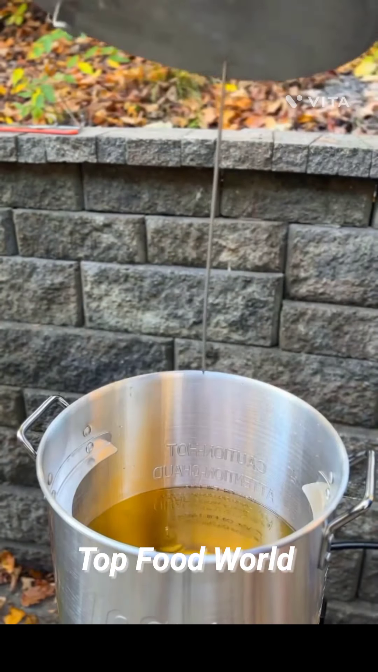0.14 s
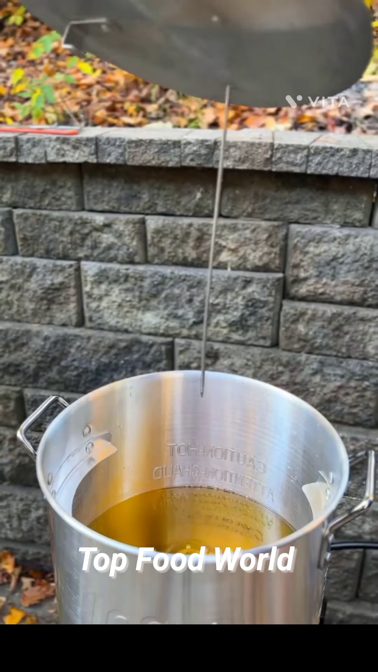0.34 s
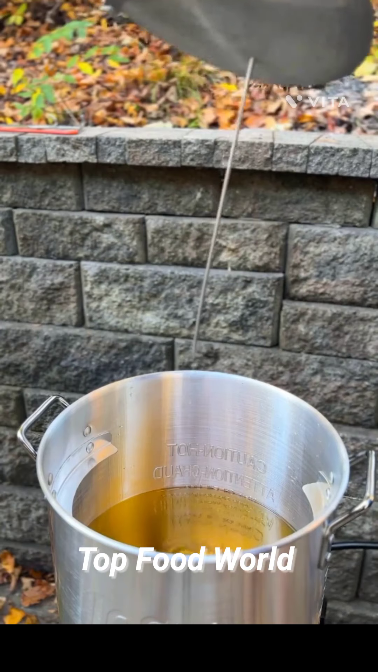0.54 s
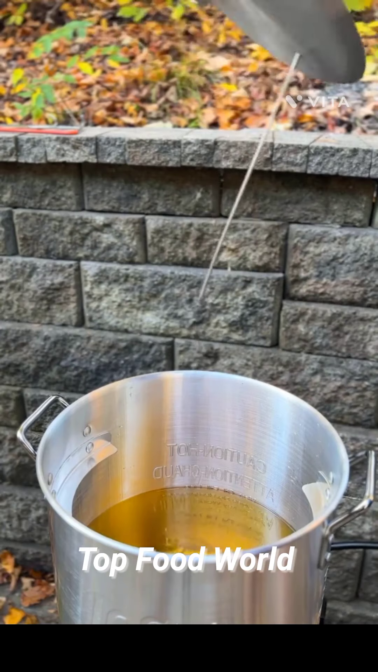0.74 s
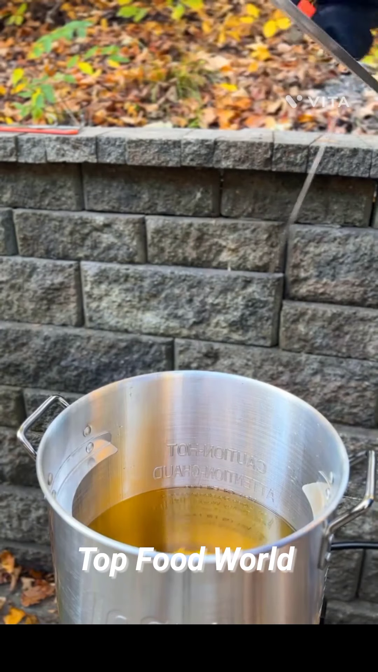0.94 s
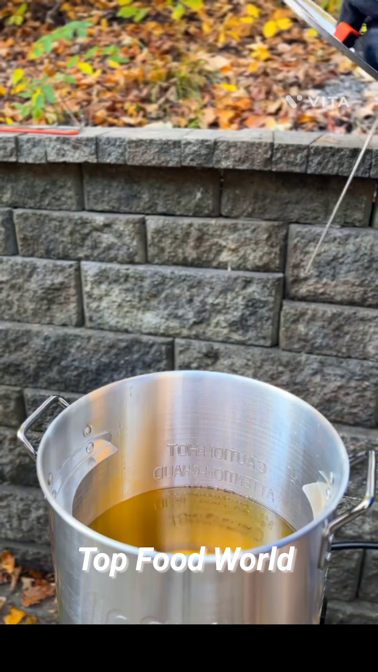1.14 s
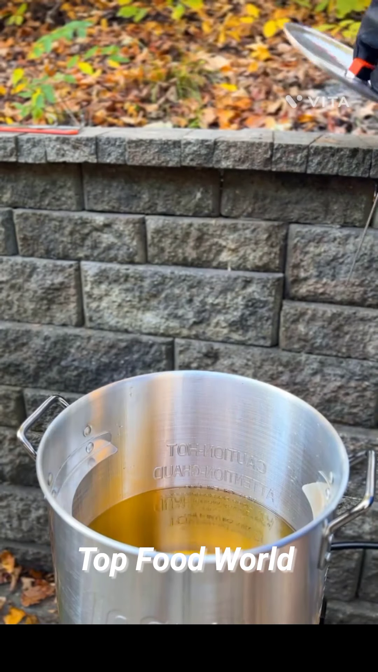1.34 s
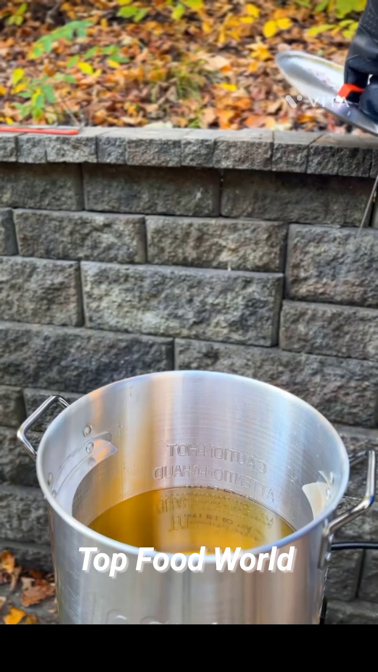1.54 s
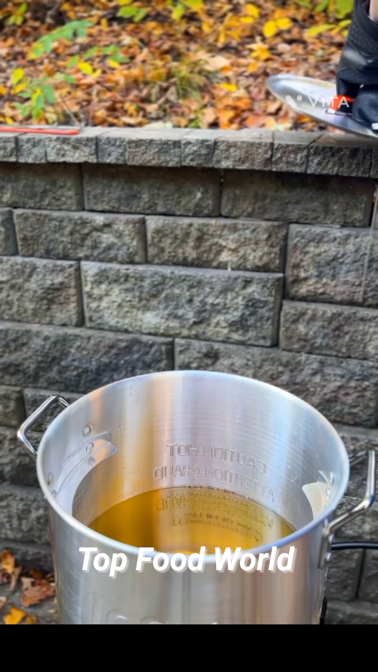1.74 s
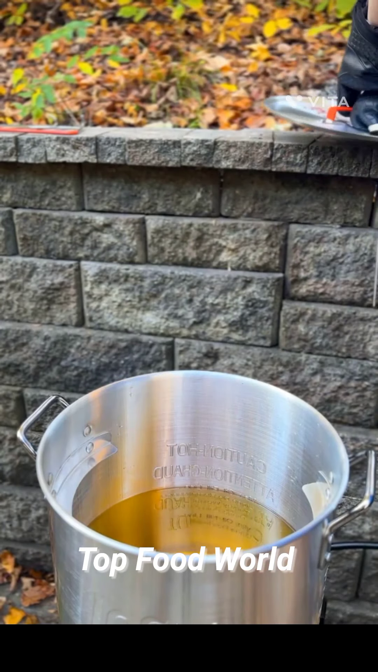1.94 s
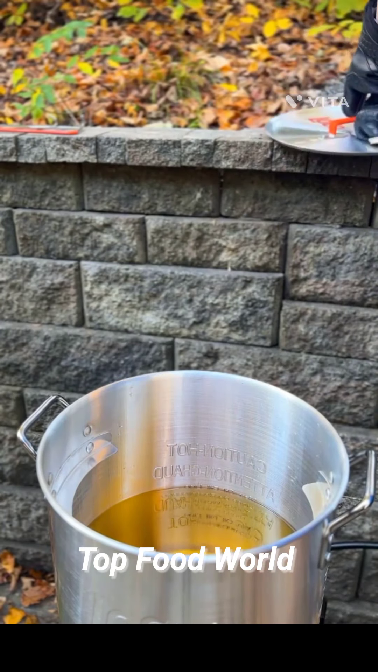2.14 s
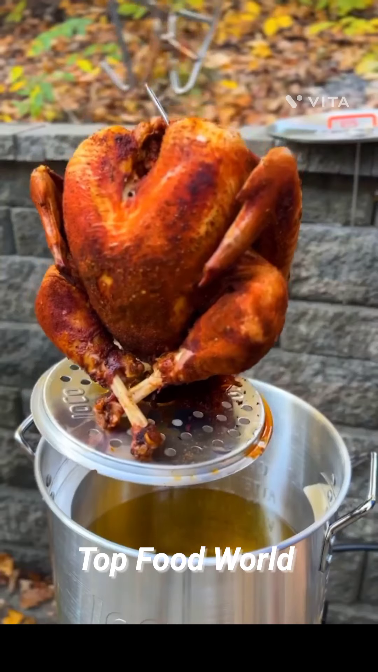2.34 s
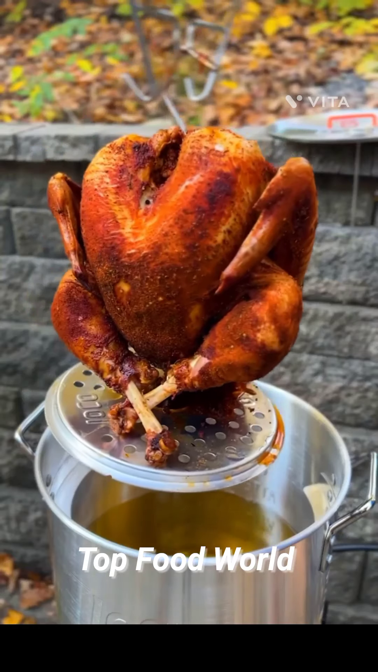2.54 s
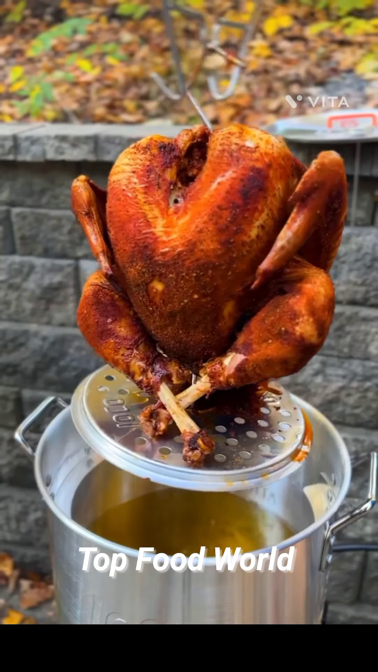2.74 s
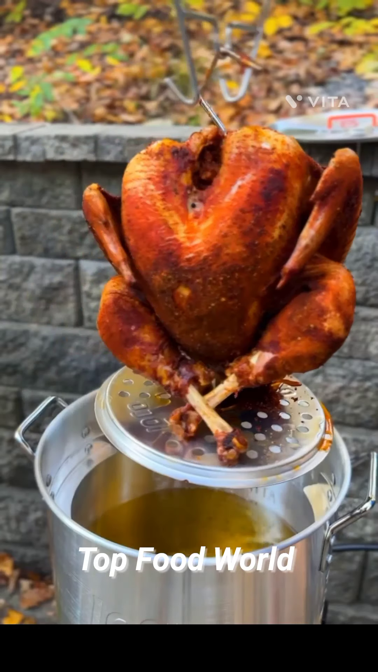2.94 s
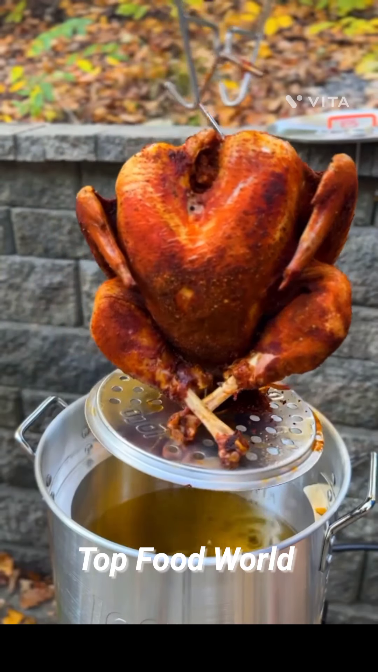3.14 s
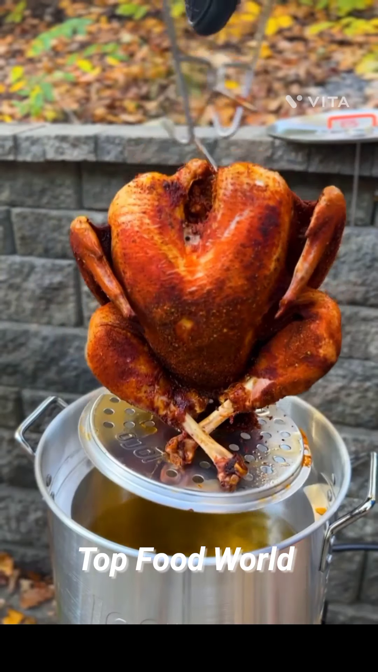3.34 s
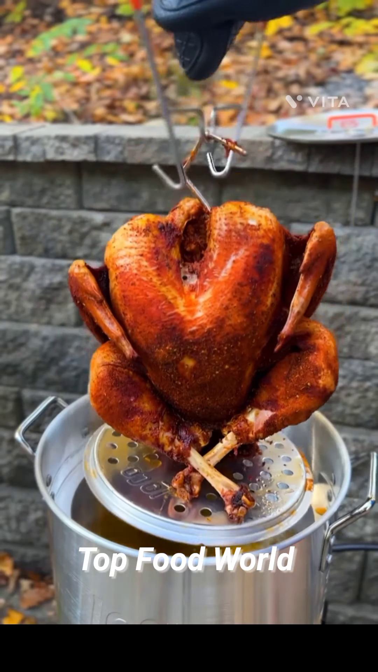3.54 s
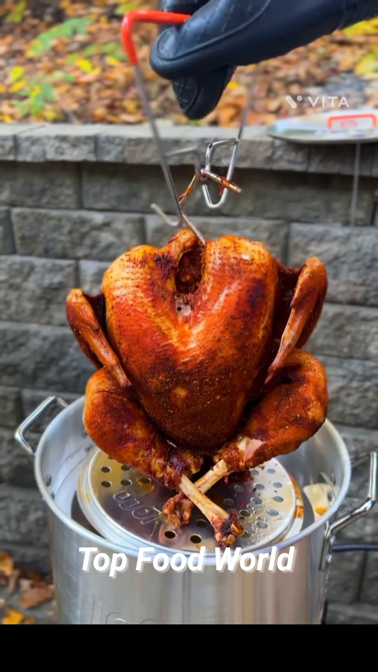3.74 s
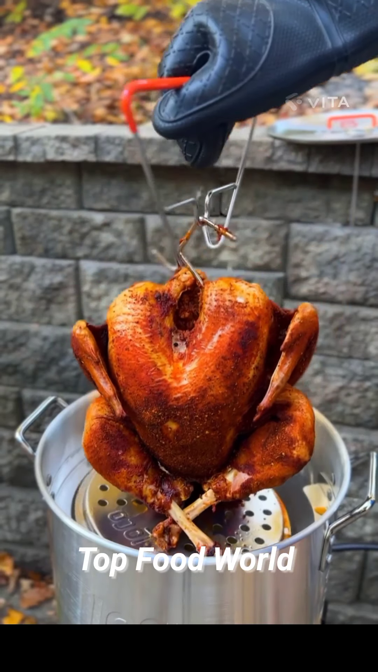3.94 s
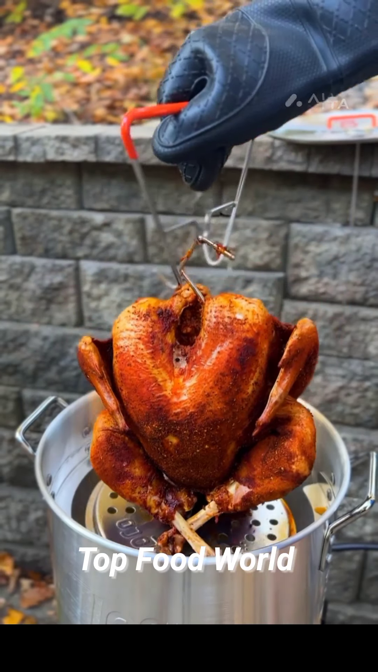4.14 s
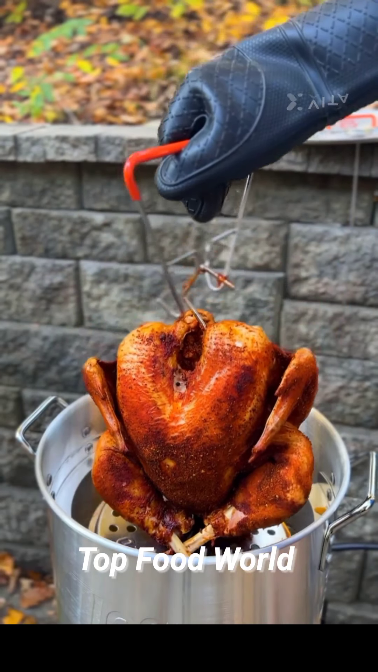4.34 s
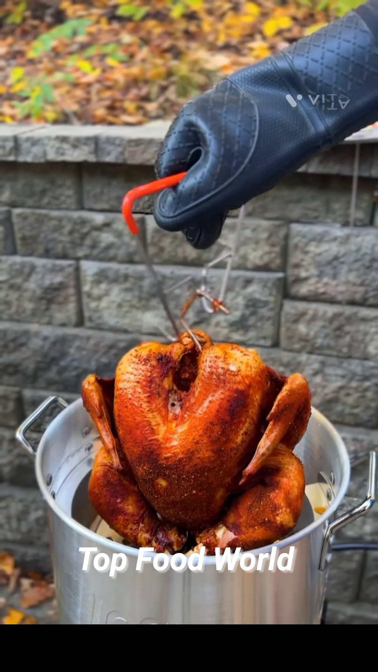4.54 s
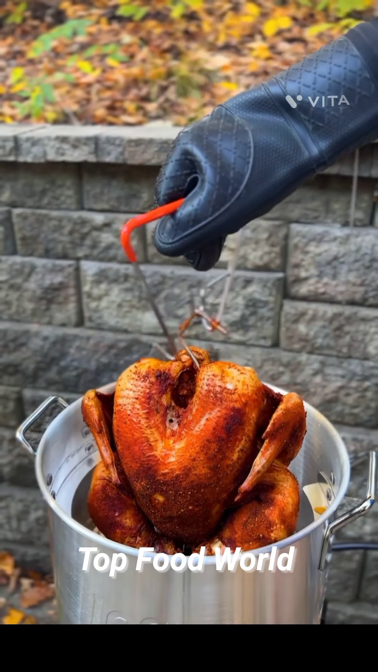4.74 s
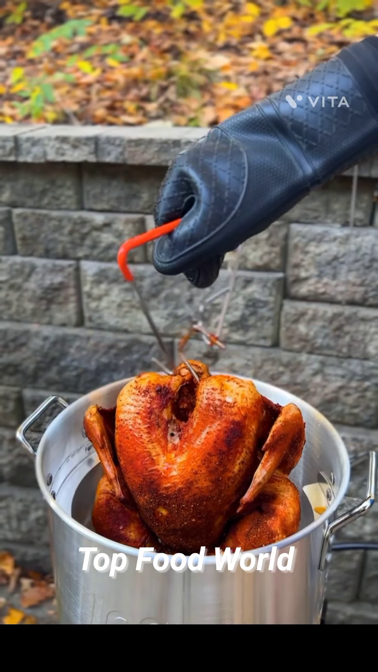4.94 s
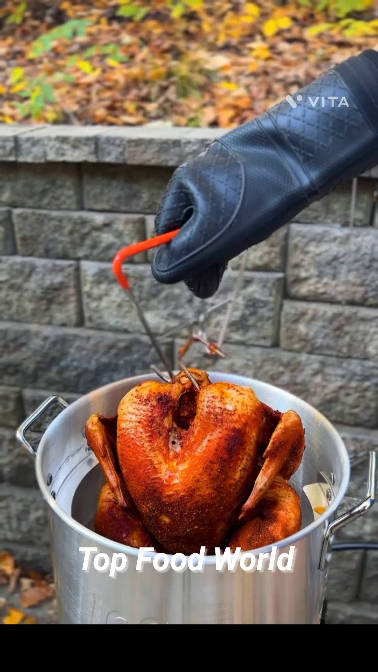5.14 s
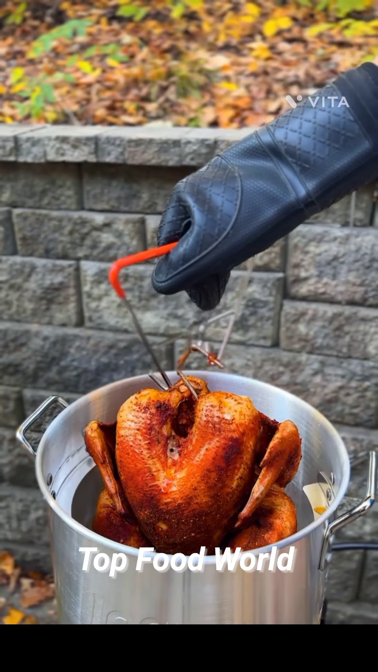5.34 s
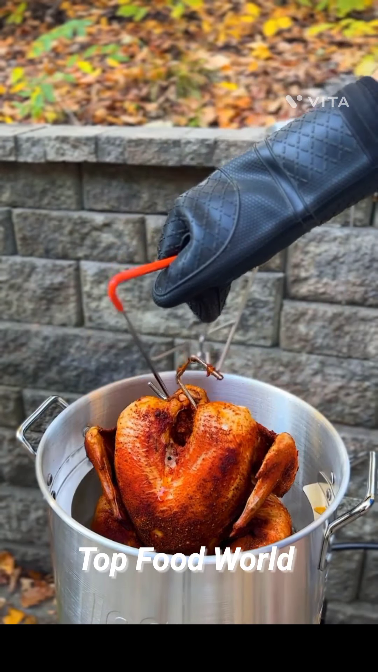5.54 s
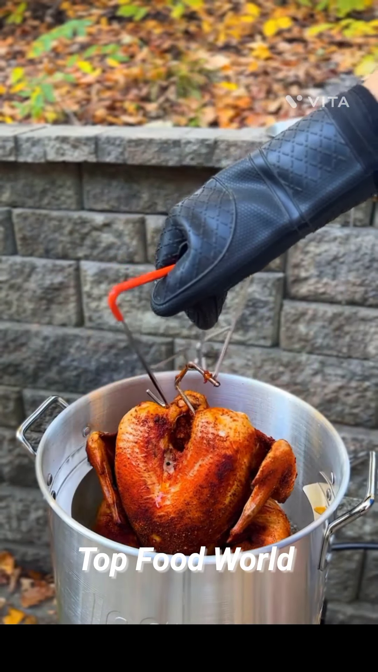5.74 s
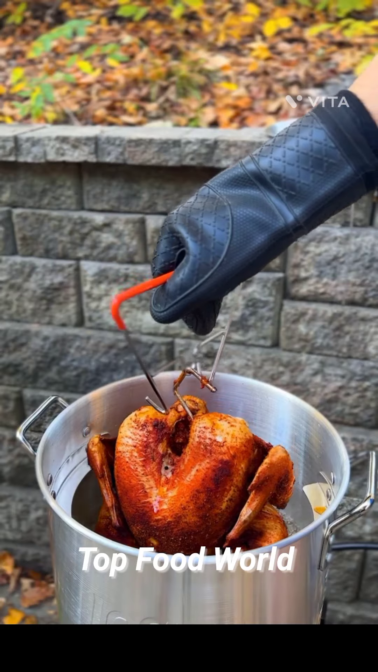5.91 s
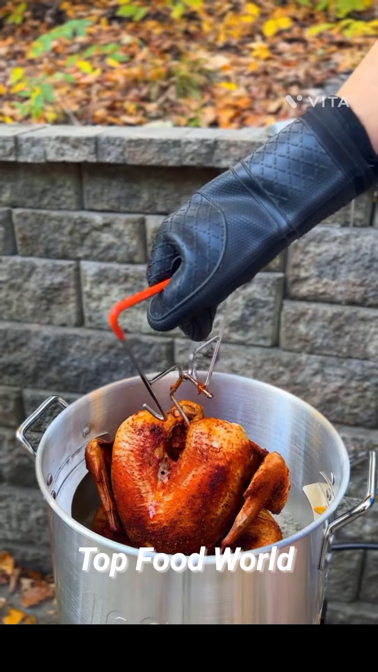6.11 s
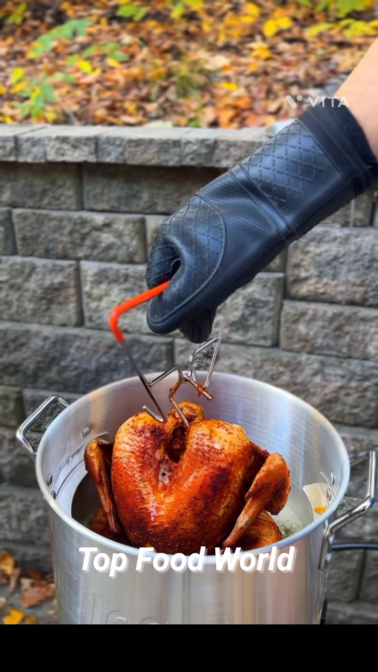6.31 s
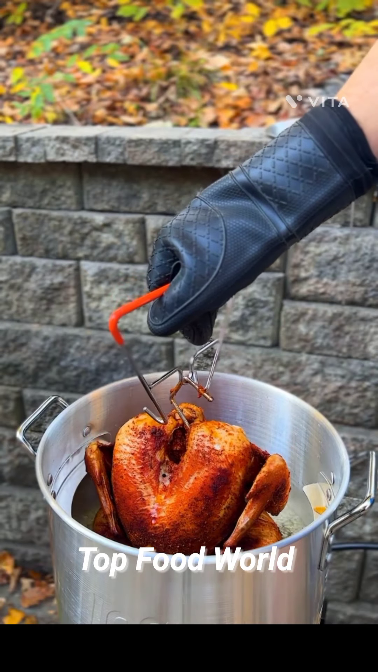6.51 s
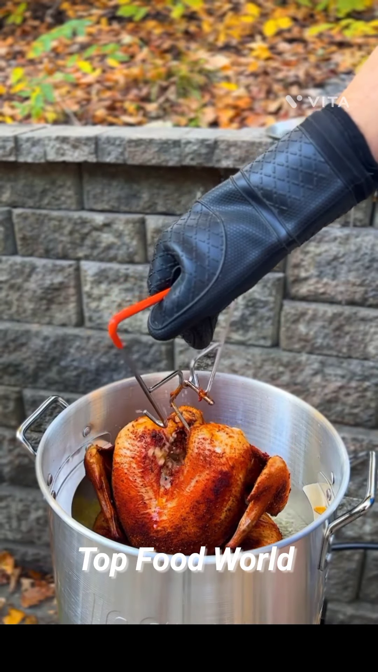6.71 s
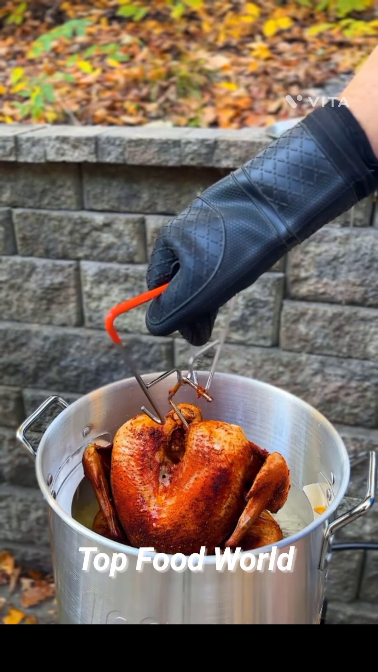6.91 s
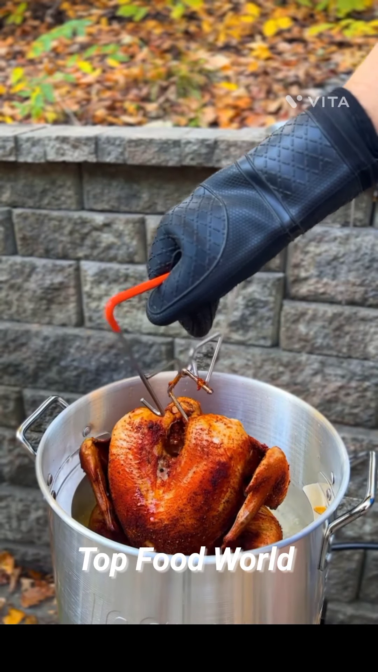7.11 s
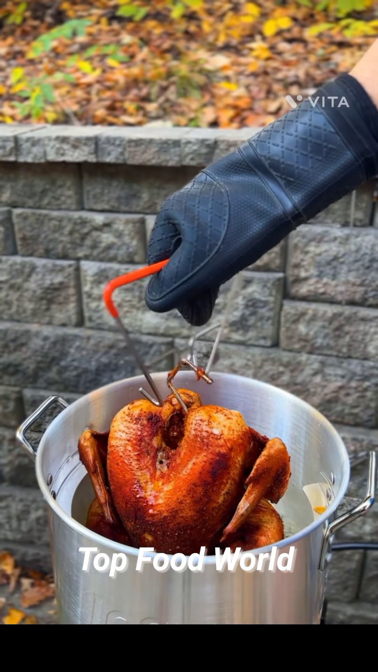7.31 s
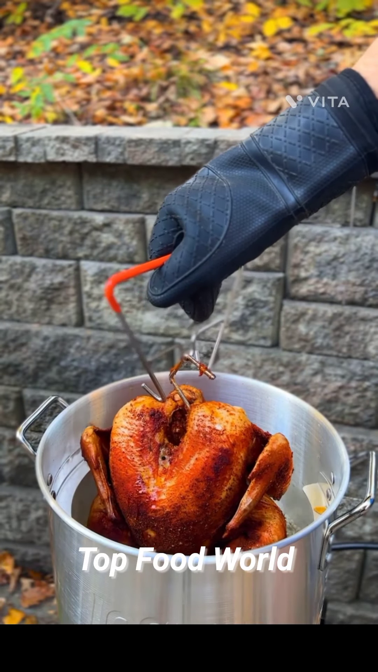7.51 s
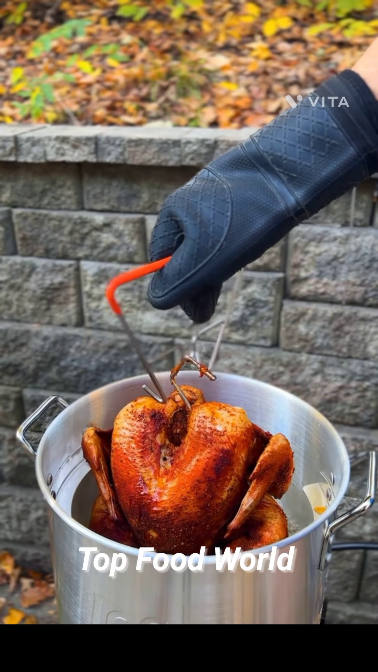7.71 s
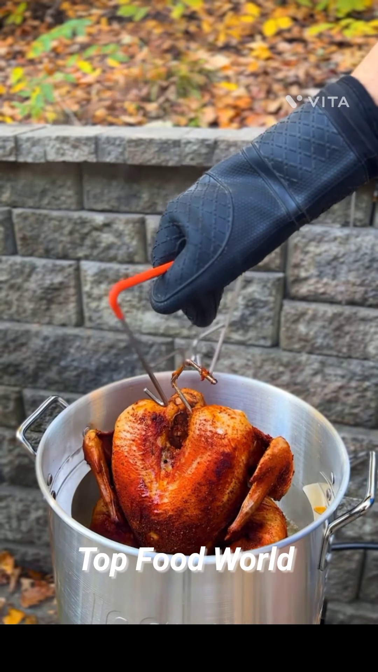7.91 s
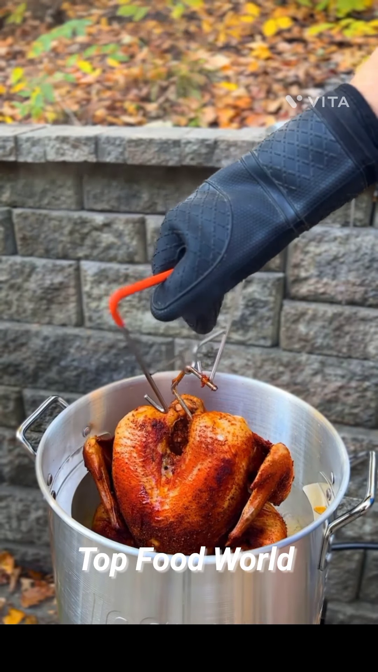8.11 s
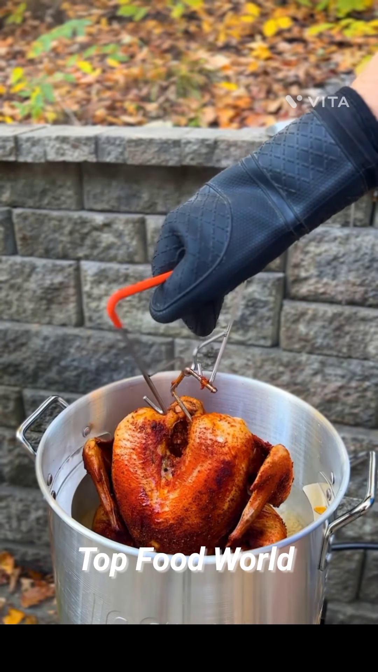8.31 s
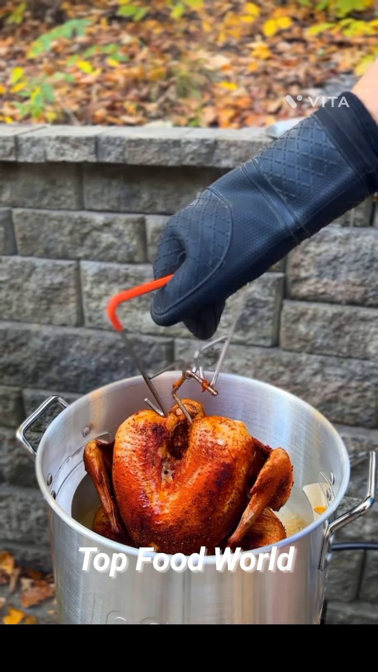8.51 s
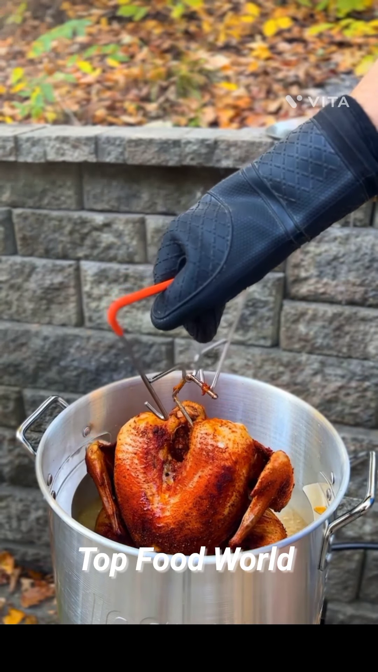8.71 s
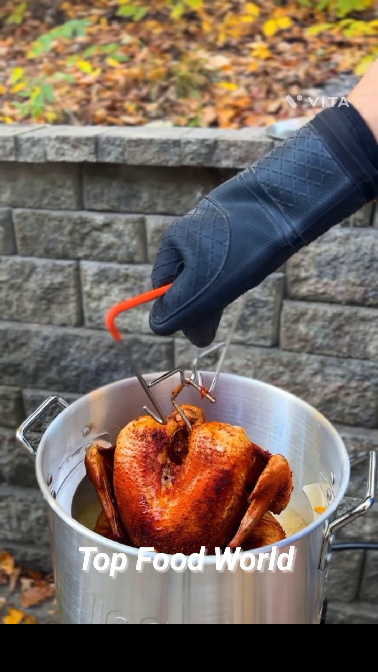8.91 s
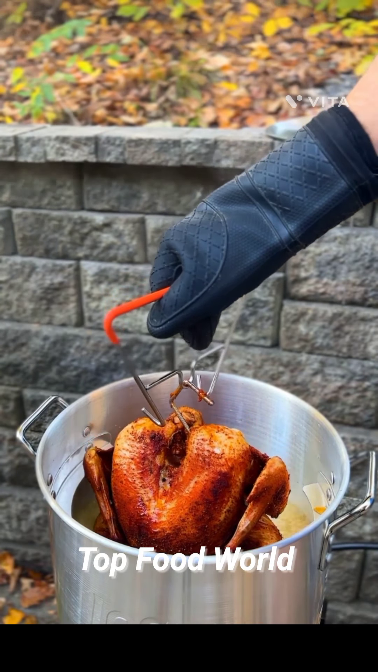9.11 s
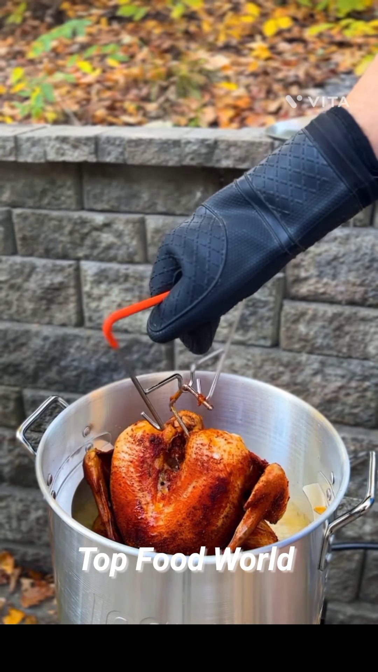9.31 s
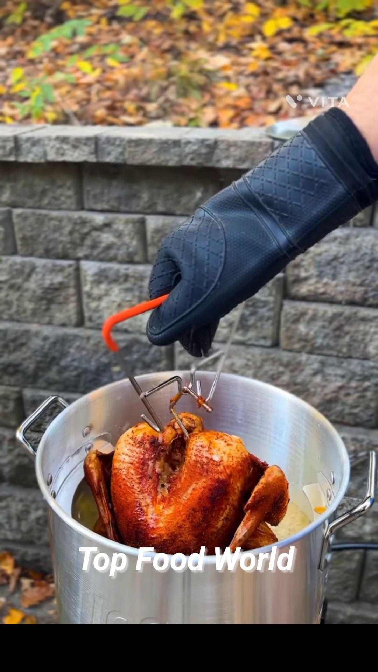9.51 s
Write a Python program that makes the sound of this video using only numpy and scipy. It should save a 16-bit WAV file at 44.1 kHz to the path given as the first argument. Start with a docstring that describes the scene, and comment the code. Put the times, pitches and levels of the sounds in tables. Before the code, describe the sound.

Hot oil pops and builds to a loud, bubbling sizzle as a turkey is lowered into a pot, after a few metal clanks.

```python
"""Hot oil boils in a tall aluminium pot as a turkey is lowered in, outdoors over a hissing gas burner.
First feet scuff in dry leaves, the lid is set on a stone wall, and a hook and rack clank.
Juice drips into the oil and flashes to steam in single pops that excite the pot's air column and wall.
As the bird sinks, wet skin squeaks, oil spits and the bubbles thicken to a roaring boil;
the bird plugs the pot, so the gaps around it resonate instead."""
import sys
import numpy as np
from scipy import signal
from scipy.fft import rfft, irfft, next_fast_len
from scipy.io import wavfile
from scipy.ndimage import uniform_filter1d, map_coordinates

SR = 44100
rng = np.random.default_rng(int(sys.argv[2]) if len(sys.argv) > 2 else 0)


def inscribe(sig):
    """Save sig as 16-bit PCM at rate SR to the path in sys.argv[1].

    A 1-D sig is mono; a 2-D sig holds one channel per row.
    Samples are clipped to [-1, 1] before scaling.
    """
    pcm = np.round(np.clip(np.atleast_2d(sig).T, -1, 1) * 32767)
    wavfile.write(sys.argv[1], SR, pcm.astype(np.int16))


N = 426006

# reverberation of the yard: frequency_hz, t60_s
YARD_DECAY = [(200, 0.3), (2000, 0.12), (12000, 0.21)]
# spectra of the low rumble and the gas jet: frequency_hz, density_db
RUMBLE_SPECTRUM = [(15, -14), (25, -1), (35, -18), (55, -7.5), (80, -6.5), (120, -12), (190, -17),
                   (400, -48), (2000, -89)]
JET_SPECTRUM = [(100, -5.5), (300, 5.5), (480, -2), (950, 0.5), (1600, -6.5), (2400, -7.5), (3450, -5),
                (4800, -13), (6000, -13.5), (6500, -12.5), (7500, -18.5), (10000, -22.5), (16000, -27)]
# level of the low rumble, from the burner and later the boiling oil: time_s, level_db
LOW_RUMBLE_LEVEL = [(0.0, -57), (1.1, -56), (3.2, -56), (4.2, -61), (5.6, -58.5), (7.61, -51.5),
                    (8.85, -61.5), (9.66, -59)]
# shoes in dry leaves, then wire scraping on metal: peak_s, level_db, centre_hz, width_octaves, sigma_s
RUBS = [(0.861, -46, 2560, 1.2, .006), (0.908, -43, 3540, 0.34, 0.0086), (0.919, -50, 3000, 1.4, 0.028),
        (0.95, -42, 1270, 1.4, 0.0058), (0.981, -50, 1200, .9, 0.016), (1.046, -49.5, 7000, 1.2, .011),
        (1.085, -58, 8400, .35, 0.02), (1.097, -58, 2600, 2, .19), (1.17, -56.5, 243, .58, .19),
        (2.222, -47, 1990, 0.049, 0.0083), (2.25, -47, 1990, 0.05, 0.007), (2.275, -48, 1960, .06, 0.0066),
        (2.284, -55, 6000, 0.065, 0.044), (2.291, -52, 7550, 0.1, .018)]
# impacts of lid on stone and of hook and rack: start_s, level_db, tilt_db_per_octave
LID_IMPACTS = [(1.749, -39, -4.5), (1.764, -38, -3), (1.775, -33, -3), (1.808, -29, -7), (1.828, -33, -3.5),
               (1.843, -37, -6), (1.869, -35, -1), (1.8745, -26.5, 2.3), (1.981, -41.5, -2)]
RACK_IMPACTS = [(2.271, -52, 4), (2.302, -46, 4.5), (2.318, -28.5, -3.5), (2.323, -28, -4), (2.328, -43, 7),
                (2.345, -28.5, -3)]
# normal modes of the lid and the rack: frequency_hz, level_db, t60_s
LID_MODES = [(509, -5, 0.13), (560, -9, 0.092), (758, -1, 0.082), (2030, -14, .09), (3170, -17, 0.18),
             (4170, -17, .08), (5370, -16, 0.16), (6270, -10, .06), (7070, -14, .06), (7700, 1.5, .014),
             (8040, -2, .014), (12100, -24, .057)]
RACK_MODES = [(182, -20.5, 0.17), (537, -5, 0.14), (597, -4.5, 0.23), (810, 4, 0.05), (1014, 1.5, 0.16),
              (1250, -2.5, 0.19), (1870, -7, 0.27), (2070, -12, 0.15), (2480, -17, 0.16), (3055, -13, 0.36),
              (3640, -19, 0.34), (5400, -21, .12), (5770, -10.5, 0.11), (7300, -4.5, 0.047),
              (8800, -15, 0.054), (10750, -27, .08)]
# the loudest single pops: start_s, level_db, pitch_hz, t60_s
DROP_POPS = [(2.6, -43.5, 2930, 0.041), (2.679, -45, 335, 0.055), (2.756, -46, 1530, 0.074),
             (2.788, -42.5, 3620, .076), (2.9625, -23, 3340, 0.033), (3.021, -34, 1510, 0.01),
             (3.151, -34.5, 1050, 0.031), (3.203, -27.5, 1750, 0.029), (3.248, -34, 1440, .058),
             (3.278, -36, 1510, 0.048), (3.311, -32.5, 896, .04), (3.423, -29, 876, 0.11),
             (3.433, -27.5, 797, 0.11), (3.4754, -23, 2880, 0.03), (3.494, -37, 800, 0.11),
             (3.529, -25, 1210, 0.06), (3.549, -34, 1230, .08), (3.584, -30, 1930, .03),
             (3.655, -22.5, 966, 0.062), (3.676, -24.5, 950, 0.079), (3.777, -26, 1862, 0.028),
             (3.795, -28, 1710, 0.045), (3.899, -29.5, 839, 0.021), (3.93, -24, 3170, 0.037),
             (3.981, -29, 1970, 0.027), (3.988, -34, 768, 0.079), (3.993, -25, 2180, 0.034),
             (4.045, -26, 2200, 0.037), (4.196, -25.5, 780, .05), (4.225, -24, 1140, 0.074),
             (4.262, -16.5, 810, 0.052), (4.408, -15.5, 650, 0.032), (4.48, -25, 910, .02),
             (4.555, -25.5, 618, 0.12), (4.584, -21, 2200, 0.031), (4.643, -17.5, 1190, .05),
             (4.684, -22, 1690, 0.065), (4.73, -15.5, 1850, 0.093), (4.762, -22, 624, .04),
             (4.861, -16.5, 1760, 0.092), (4.962, -24.5, 1630, 0.095), (4.987, -22.5, 760, 0.053),
             (5.037, -18, 1060, 0.029), (5.143, -18.5, 1880, 0.06), (5.213, -14, 1063, 0.052),
             (5.248, -17, 1070, 0.039), (5.33, -16.5, 2046, 0.068), (5.359, -16.5, 1604, .09),
             (5.448, -18, 2730, 0.06), (5.493, -16.5, 2910, 0.05)]
# resonances of the air column, thin wall and gaps around the bird: frequency_hz, bandwidth_hz, gain_db
AIR_MODES = [(311, 57, 15), (793, 60, 15), (1040, 140, 5), (1570, 37, 3.5), (2130, 40, -6), (3430, 87, 4)]
WALL_MODES = [(1505, 12, 0), (2130, 14, 2), (2650, 14, 3), (3290, 14, 5), (3900, 16, 14), (4800, 18, 9),
              (5190, 18, 7), (6500, 25, 6)]
GAP_MODES = [(384, 72, -1), (613, 75, -11), (845, 38, -28), (950, 79, -11), (1133, 64, -15),
             (1615, 81, -10.5), (1895, 49, -5), (3500, 94, -7), (5130, 300, -12)]
# spectra of a pop's fizz, bursts in the open pot and the full boil: frequency_hz, density_db
FIZZ_SPECTRUM = [(700, -1), (1500, -1), (3800, -1), (5500, -4), (7500, -9), (10000, -20), (16000, -29)]
BURST_SPECTRUM = [(130, -10.5), (300, -6.5), (540, -9.5), (1000, 1.5), (2400, -1.5), (4000, -11),
                  (7000, -16), (10000, -25.5), (16000, -33)]
BOIL_SPECTRUM = [(60, -19.5), (150, -6), (230, -4.5), (310, 0), (385, -2), (480, -6.5), (630, -6),
                 (900, -3), (1400, -5.5), (2300, -7.5), (3300, -5), (3900, -9), (5200, -15.5), (9800, -33),
                 (16000, -38)]
# steam escaping wet skin: start_s, level_db, pitch_hz, length_s
SKIN_SQUEAKS = [(2.928, -36, 2520, 0.032), (3.21, -35, 5000, 0.031), (3.397, -34.5, 4970, 0.013),
                (3.427, -39, 2830, 0.021), (3.555, -35, 5900, 0.0144), (3.632, -40, 3000, 0.03),
                (3.713, -30, 5280, 0.024), (4.058, -33, 4770, 0.026), (4.088, -32, 6830, 0.012),
                (4.327, -27.5, 3800, 0.016), (4.45, -23.5, 3360, 0.015), (4.497, -35, 4540, .018),
                (4.935, -24, 4680, 0.0091), (5.075, -30, 4000, 0.021), (5.116, -18, 6800, 0.01)]
# strength of the steam leaving the oil: time_s, level_db
STEAM_LEVEL = [(2.5, -61), (3.0, -59), (3.56, -44), (3.63, -40), (4.08, -42), (4.27, -41), (4.41, -34),
               (5.37, -27), (5.77, -28), (5.99, -26), (6.49, -24), (6.83, -21), (7.76, -21), (7.96, -23),
               (9.18, -26), (9.66, -26.5)]
# runs of big bubbles as oil floods the bird's hollows: peak_s, boost_db, sigma_s
FLOOD_GLUGS = [(5.776, 7.5, 0.22), (7.62, 3.5, 0.18), (8.192, 3, 0.28)]
# sharp spits of oil: start_s, level_db
OIL_SPITS = [(3.5986, -18.5), (3.6146, -11.5), (4.388, -20), (5.12, -23), (5.378, -14), (5.625, -15),
             (5.9445, -9.5), (6.8137, -7), (7.0397, -3.5), (7.098, -8), (7.324, -7), (8.356, -5.5),
             (8.53, -12)]
# big bubbles tearing beside the bird: start_s, level_db, brightness_hz
BUBBLE_GULPS = [(5.537, -10, 900), (5.686, -15, 450), (5.766, -13, 600), (7.788, -10, 900),
                (7.894, -10, 900), (8.138, -13, 1200), (8.203, -9, 650), (8.366, -10.5, 650),
                (8.4845, -7.5, 2200), (8.697, -13.5, 1400), (8.783, -11.5, 900), (8.819, -10, 900),
                (8.881, -12, 950), (8.92, -14, 800), (9.048, -11.5, 900), (9.135, -16, 1000),
                (9.262, -13, 1600), (9.329, -12.5, 950), (9.522, -13.5, 1500), (9.565, -11.5, 850)]

# the steady patter of bubbles begins, the bird touches the oil, its legs are in, it plugs the pot
PATTER_S, TOUCH_S, WET_S, SUNK_S = 3, 4.57, 5.55, 6.5
EASE_S, CALM_S = 7.7, 8.9  # the boil eases between these times


def amp(db):
    """Amplitude ratio of a level in decibels."""
    return 10 ** (np.asarray(db) / 20)


def unit(x):
    """Normalisation to rms 1."""
    return x / np.sqrt(np.mean(x ** 2) + 1e-20)


def steady(x):
    """Division by the running rms removes slow changes of level."""
    power = uniform_filter1d(uniform_filter1d(x * x, SR // 6), SR // 6)
    return x / np.sqrt(np.abs(power) + 1e-12)


def along(points, hz):
    """Interpolation on a logarithmic frequency axis."""
    frequencies, values = np.transpose(points)
    return np.interp(np.log(hz + 1), np.log(frequencies + 1), values)


def contour(points):
    """Linear interpolation in time, one value a sample."""
    return np.interp(np.arange(N) / SR, *np.transpose(points))


def ramp(start_s, end_s):
    """Linear transition from 0 to 1."""
    return np.clip((np.arange(N) / SR - start_s) / max(end_s - start_s, 1e-3), 0, 1)


def swell(peak_s, rise_s, fall_s):
    """Two-sided Gaussian envelope of height 1."""
    t = np.arange(N) / SR - peak_s
    return np.exp(-(t / np.where(t < 0, rise_s, fall_s)) ** 2 / 2)


def wobble(knots_per_s):
    """Smooth random modulation: a spline through Gaussian values."""
    knots = rng.standard_normal(int(N * knots_per_s / SR) + 4)
    return map_coordinates(knots, [np.arange(N) * knots_per_s / SR])


def add(track, start_s, sound):
    """Superposition of a sound on a track."""
    part = track[round(start_s * SR):][:len(sound)]
    part += sound[:len(part)]


def coloured(x, spectrum, size=4096):
    """Minimum-phase filtering shapes the spectrum and keeps attacks sharp."""
    gain = amp(along(spectrum, np.fft.rfftfreq(size, 1 / SR)))
    cepstrum = irfft(np.log(gain + 1e-6))
    cepstrum[1:size // 2] *= 2
    cepstrum[size // 2 + 1:] = 0
    return signal.fftconvolve(x, irfft(np.exp(rfft(cepstrum))))[:N]


def band(x, lo_hz, hi_hz, order=2):
    """Causal Butterworth band-pass."""
    edges_hz = [lo_hz, min(hi_hz, SR / 2 - 1000)]
    return signal.sosfilt(signal.butter(order, edges_hz, "band", fs=SR, output="sos"), x)


def echoes(x, wet_db, size=8192):
    """Diffuse reverberation: each block of sound gains its own short tail of decaying noise."""
    blocks = np.pad(x, (0, -N % size)).reshape(-1, size)
    hz, t, noise = signal.stft(rng.standard_normal(blocks.shape), SR, nperseg=256)
    decay = amp(-60 * t / along(YARD_DECAY, hz)[:, None])
    tails = signal.istft(noise * decay, SR, nperseg=256)[1]
    tails /= np.linalg.norm(tails, axis=1, keepdims=True)
    out = x.copy()
    for k, tail in enumerate(signal.fftconvolve(blocks, tails, axes=1)):
        add(out, k * size / SR + .002, amp(wet_db) * tail)
    return out


def ringing(modes):
    """Impulse response of damped resonators: the wider the band, the faster the decay."""
    t = np.arange(SR // 4) / SR
    return sum(amp(db) * 2 * np.pi * width / SR * np.exp(-np.pi * width * t) * np.cos(2 * np.pi * hz * t)
               for hz, width, db in modes)


def resonate(x, modes, ring_db):
    """Forced response of the modes, added to the direct sound."""
    return x + amp(ring_db) * signal.fftconvolve(x, ringing(modes))[:N]


def in_open_pot(x, air_db, wall_db):
    """Resonators in series: the air column drives the aluminium wall."""
    return resonate(resonate(x, AIR_MODES, air_db), WALL_MODES, wall_db)


def burner(sway_hz=4.3):
    """Broadband noise: burner and later the boil rumble, the jet hisses; an infrasonic sway fades."""
    t = np.arange(N) / SR
    rumble = unit(coloured(rng.standard_normal(N), RUMBLE_SPECTRUM))
    rumble *= amp(3.5 + contour(LOW_RUMBLE_LEVEL) + 2.4 * wobble(11))
    jet = unit(coloured(rng.standard_normal(N), JET_SPECTRUM)) * amp(-56.5 + .5 * wobble(4.76))
    sway = amp(-31.5 - 4.5 * t) * np.sin(2 * np.pi * sway_hz * t + .5 * wobble(3.8))
    return rumble + jet + sway * (1 - ramp(2.4, 2.5))


def scuffs(cracks_per_s=9000, grit_db=1.8):
    """Friction noise: each rub of leaves or wire is a swelling cloud of tiny impulses."""
    out, t = np.zeros(N), np.arange(SR // 2) / SR - .25
    for peak_s, db, hz, octaves, sigma_s in RUBS:
        cracks = (rng.random(len(t)) < cracks_per_s / SR) * rng.standard_normal(len(t))
        cloud = unit(band(cracks, hz / 2 ** (octaves / 2), hz * 2 ** (octaves / 2), order=1))
        add(out, peak_s + t[0], amp(db) * np.exp(-(t / sigma_s) ** 2 / 2) * cloud)
    grit = unit(amp(grit_db * wobble(250)))
    return echoes(band(out * grit, 100, 11000, order=1), wet_db=-9)


def struck(impacts, modes, click_db, click_t60_s, click_hz=5000):
    """Modal vibration: each impact clicks and excites the metal anew; chatter roughens the phases."""
    out, t = np.zeros(N), np.arange(SR // 3) / SR
    hz, mode_db, t60_s = np.transpose(modes)[:, :, None]
    for start_s, db, tilt in impacts:
        strength_db = mode_db + tilt * np.log2(hz / 800) + rng.normal(0, 1.8, hz.shape)
        chatter = np.cumsum(rng.standard_normal((len(hz), len(t))), axis=1) * .006 * np.sqrt(hz / 800)
        phase = 2 * np.pi * (hz * t + chatter + rng.random(hz.shape))
        ring = np.sum(amp(strength_db - 60 * t / t60_s) * np.sin(phase), axis=0)
        click = band(rng.standard_normal(len(t)), 250, 4300, order=1)
        click *= amp(click_db + tilt * np.log2(click_hz / 800) - 60 * t / click_t60_s)
        add(out, start_s, amp(db) * (ring + click))
    return out


def lid():
    """Repeated impacts excite the lid's modes as it chatters on the stone and drops."""
    return echoes(struck(LID_IMPACTS, LID_MODES, click_db=4, click_t60_s=.021), wet_db=-3.5)


def rack():
    """The hook and rack collide and ring in damped free vibration."""
    return echoes(struck(RACK_IMPACTS, RACK_MODES, click_db=1, click_t60_s=.11), wet_db=-9.5)


def pops(rise=.0487, rise_s=.016, snap_db=-14, snap_t60_s=.0066):
    """Cavity resonance: a bursting drop snaps and rings upward in pitch; its puff booms in the pot."""
    out, booms, t = np.zeros(N), np.zeros(N), np.arange(SR // 6) / SR
    boom = band(ringing(AIR_MODES), 160, 1060)
    boom /= np.abs(boom).max()
    glide = 1 + rise * (1 - np.exp(-t / rise_s))
    for start_s, db, hz, t60_s in DROP_POPS:
        roughness = .18 if start_s < TOUCH_S else .6  # wet skin splutters more than drips
        turns = np.cumsum(hz * (glide + roughness * rng.standard_normal(len(t)))) / SR
        ring = amp(-60 * t / t60_s) * (1 - np.exp(-t * hz)) * np.sin(2 * np.pi * turns)
        snap = amp(snap_db - 60 * t / snap_t60_s) * band(rng.standard_normal(len(t)), 620, 3000)
        boom_db = -24 + .6 * (db + 20) - 3.5 * np.log2(hz / 1000)  # loud, low pops boom most
        add(out, start_s, amp(db) * (ring + snap))
        add(booms, start_s, amp(boom_db) * boom)
    return echoes(in_open_pot(out, air_db=-17, wall_db=-5) + booms, wet_db=-13)


def bubbles(lo_hz, hi_hz, per_s, cycles, spread_db, rise):
    """Bubbles are damped oscillators of random size and life; rise lifts their pitch as they surface."""
    due = np.cumsum(per_s) / SR
    when, pitch, life, size = rng.random((int(due[-1]), 4)).T
    start = np.searchsorted(due, np.arange(len(when)) + 2 * when)
    hz = lo_hz * (hi_hz / lo_hz) ** pitch
    decay_s = cycles * 2 ** (2 * life - 1) / hz
    t = np.arange(min(int(5 * cycles / lo_hz * SR), 900)) / SR
    age = t / decay_s[:, None]
    envelope = (1 - np.exp(-10 * age)) * np.exp(-age) * (1 - t / t[-1])
    wave = envelope * np.sin(2 * np.pi * hz[:, None] * t * (1 + rise * age / (1 + age)))
    wave *= (amp(spread_db * size ** 2) * hz)[:, None]  # most are weak, a few stand out
    return np.bincount((start[:, None] + np.arange(len(t))).ravel(), wave.ravel(), N)[:N]


def splatter(rise_s=.012, fall_s=.036):
    """Tiny bubbles fizz before and after each pop and ring the pot; incoherent sources add in power."""
    power, t = np.zeros(N), np.arange(SR // 2) / SR - .1
    envelope = np.exp(-np.abs(t) / np.where(t < 0, rise_s, fall_s))
    for pop_s, pop_db, _, _ in DROP_POPS:
        fizz_db = -48 + .4 * (pop_db + 20)
        add(power, pop_s + t[0], (amp(fizz_db) * envelope) ** 2)
    bursts = bubbles(800, 7000, per_s=np.full(N, 700), cycles=3, spread_db=12, rise=0)
    fizz = np.sqrt(power) * unit(coloured(bursts, FIZZ_SPECTRUM))
    return echoes(in_open_pot(fizz, air_db=-3, wall_db=0), wet_db=-9)


def squeaks(octaves_per_s=22, hoarseness=.2):
    """Steam squeezed from wet skin sounds rising tones, made hoarse by random frequency modulation."""
    out = np.zeros(N)
    for start_s, db, hz, length_s in SKIN_SQUEAKS:
        t = np.arange(int(length_s * SR)) / SR
        jitter = 1 + hoarseness * rng.standard_normal(SR // 4)[:len(t)]
        pitch_hz = hz * 2 ** (octaves_per_s * (t - length_s / 2)) * jitter
        envelope = amp(db - 4) * np.sin(np.pi * t / length_s) ** 2
        add(out, start_s, envelope * np.sin(2 * np.pi * np.cumsum(pitch_hz) / SR))
    return echoes(in_open_pot(band(out, 1500, 7500), air_db=-6, wall_db=-5), wet_db=-13)


def seethe(bursts, lo_hz, hi_hz, wash_db, wet_db, buried, flutter_db=0):
    """Resonance shifts from open pot to gaps as the bird sinks; buried bubbles merge to a noise wash."""
    size_band = lambda x: steady(band(x, lo_hz, hi_hz, order=3))
    boil = lambda x: size_band(resonate(coloured(x, BOIL_SPECTRUM), GAP_MODES, ring_db=0))
    sunk = buried + (.98 - buried) * ramp(TOUCH_S, SUNK_S)  # share of buried bubbles
    even_bursts = steady(echoes(bursts, wet_db))
    open_pot = size_band(in_open_pot(coloured(even_bursts, BURST_SPECTRUM), air_db=0, wall_db=-3))
    wash = amp(wash_db - 4 * ramp(EASE_S, CALM_S)) * boil(rng.standard_normal(N))
    plugged_pot = steady(boil(even_bursts) + wash)
    return steady((1 - sunk) * open_pot + sunk * plugged_pot) * amp(flutter_db * wobble(20))


def frying(full_steam_db=-21, doubling_db=4.5):
    """Flash boiling: water turns to steam in the oil; more steam makes denser, louder bubbles."""
    steam_db = contour(STEAM_LEVEL)
    rate = 130 + 1100 * 2 ** ((steam_db - full_steam_db) / doubling_db)  # drips plus steam
    # four sizes of bubble, largest first
    blubs = unit(bubbles(219, 685, rate / 2, cycles=1, spread_db=11.7, rise=.029))
    plops = unit(bubbles(606, 2190, rate, cycles=3, spread_db=11, rise=.1))
    smacks = amp(-4) * unit(band(blubs, 450, 3300))  # a big bubble's skin tears
    big = seethe(blubs, 80, 644, wash_db=-6.5, wet_db=-13, buried=.037)
    middle = seethe(plops + smacks, 580, 1880, wash_db=-2.5, wet_db=-6.5, buried=.41, flutter_db=.5)
    ticks = bubbles(1962, 5950, rate * 2, cycles=4.4, spread_db=27.5, rise=.028)
    crackle = seethe(ticks, 1300, 7400, wash_db=2, wet_db=-4.5, buried=.28)
    prickles = bubbles(4440, 14500, rate * 3, cycles=4, spread_db=27, rise=.027)
    spray = seethe(prickles, 6170, 21400, wash_db=3.5, wet_db=-.5, buried=.32, flutter_db=.45)

    dipped = ramp(TOUCH_S, WET_S)
    flash = swell(6.36, rise_s=.34, fall_s=.38)  # the wet skin flashes off as it goes under

    def strength(drip_db, dipped_db, flash_db=0):
        """Gain of one bubble size, from its levels relative to the steam."""
        return amp(steam_db + (1 - dipped) * drip_db + dipped * dipped_db + flash * flash_db)

    glug_db = sum(db * swell(peak_s, sigma_s, sigma_s) for peak_s, db, sigma_s in FLOOD_GLUGS)
    patter = amp(-61.5)  # dripping juice keeps the pot booming
    gurgle = (strength(-7, -7.5) * amp(glug_db) + patter) * big + strength(-.94, -.73) * middle
    sizzle = strength(-10, -2.34, flash_db=3.95) * crackle + strength(-19.5, -11, flash_db=5.7) * spray
    # the oil heaves, more as the boil eases, so larger bubbles surface in clusters
    heave = unit(amp((.32 + .3 * ramp(EASE_S, CALM_S)) * wobble(24)))
    return ramp(PATTER_S, PATTER_S + .07) * (heave * gurgle + sizzle)


def spits(t60_s=.025):
    """Impulsive excitation: droplets tear open at the surface with a wet crack that rings the pot."""
    out, t = np.zeros(N), np.arange(SR // 30) / SR
    for start_s, db in OIL_SPITS:
        add(out, start_s, amp(db - 7 - 60 * t / t60_s) * rng.standard_normal(len(t)))
    cracks = band(out, 1400, 5500, order=1)
    return echoes(in_open_pot(cracks, air_db=-4, wall_db=-6), wet_db=-17)


def gulps(slosh_t60_s=.065, tear_db=2, tear_t60_s=.004):
    """Big bubbles tear open and slosh, driving the resonances of the gaps around the bird."""
    out, t = np.zeros(N), np.arange(SR // 8) / SR
    envelope = amp(-60 * t / slosh_t60_s) + amp(tear_db - 60 * t / tear_t60_s)
    for start_s, db, hz in BUBBLE_GULPS:
        gulp = band(envelope * rng.standard_normal(len(t)), hz / 2.4, hz * 1.2)
        add(out, start_s, amp(db) * gulp / np.abs(gulp).max())
    return echoes(resonate(out, GAP_MODES, ring_db=0), wet_db=-12)


def scene():
    """Superposition: the pressures of all sources add at one listening point."""
    yard = lid() + rack() + burner() + scuffs()
    oil = frying() + pops() + gulps() + splatter() + squeaks() + spits()
    return (yard + oil)[None]


def record(dry, cutoff_hz=15850):
    """Band limiting: an ideal low-pass removes everything above the cutoff."""
    size = next_fast_len(N + SR // 2)
    passband = np.fft.rfftfreq(size, 1 / SR) < cutoff_hz
    return irfft(rfft(dry[0], size) * passband, size)[None, :N]


dry = scene()
out = record(dry)
inscribe(out)
```